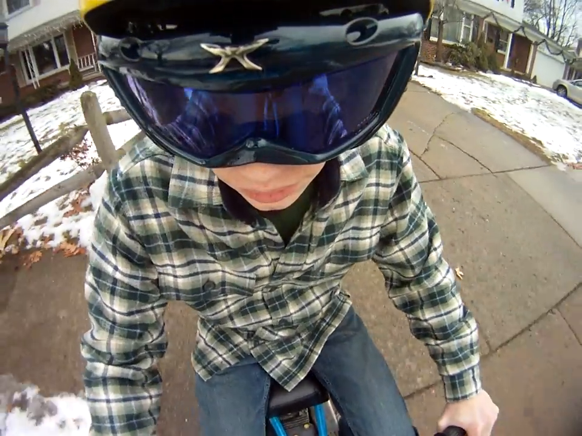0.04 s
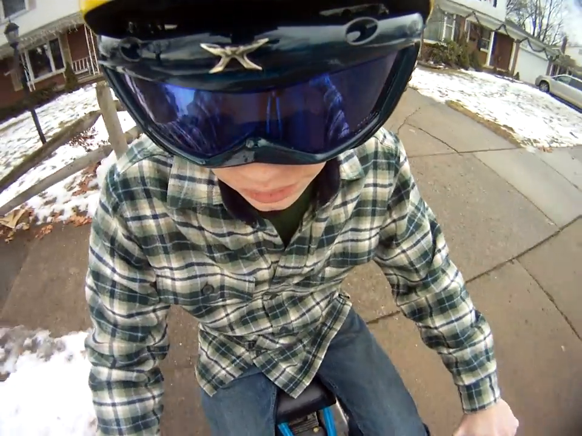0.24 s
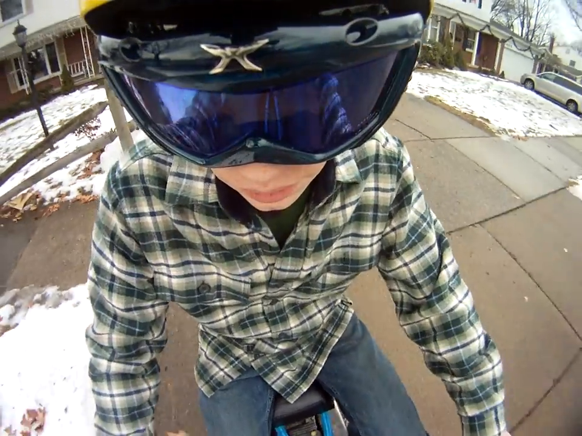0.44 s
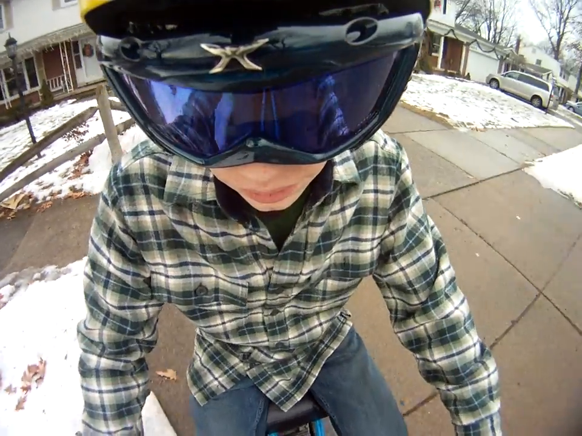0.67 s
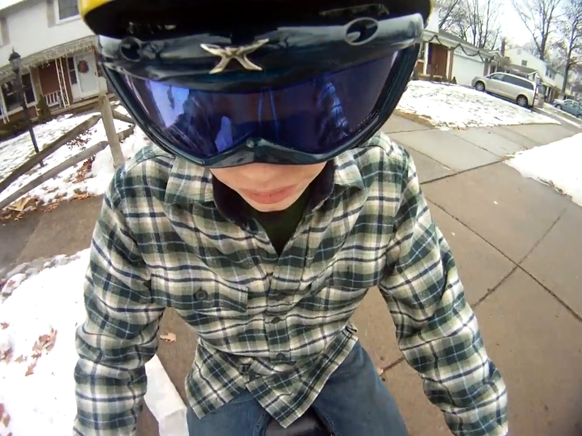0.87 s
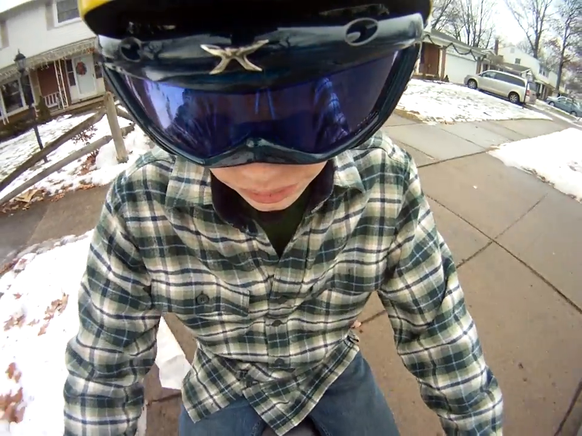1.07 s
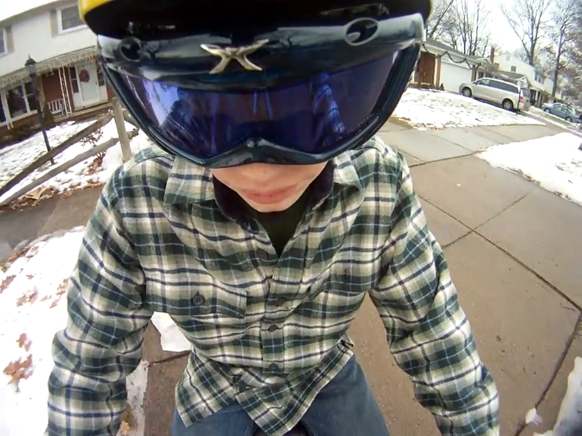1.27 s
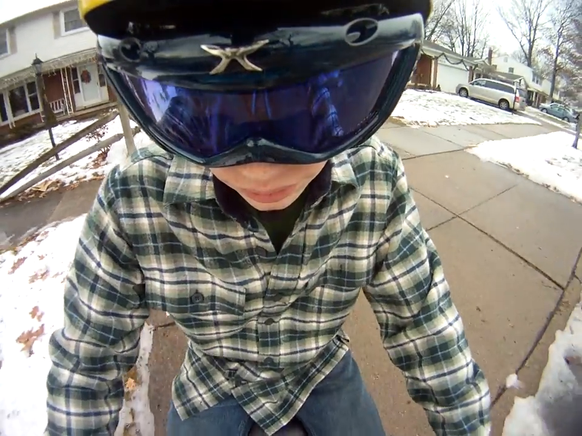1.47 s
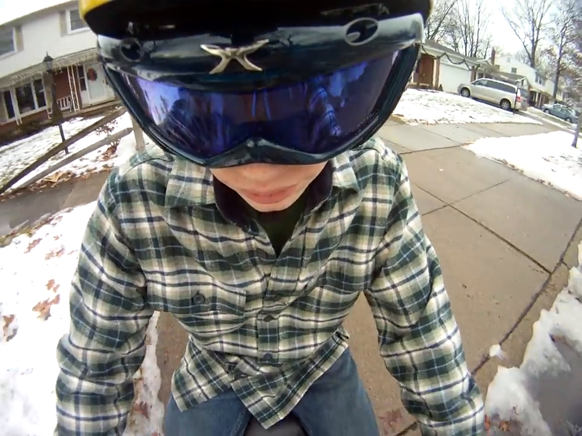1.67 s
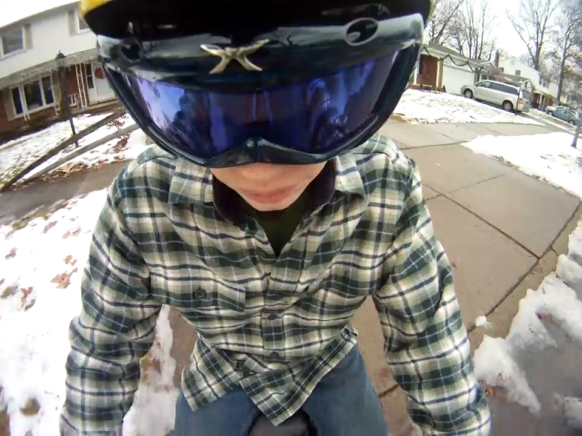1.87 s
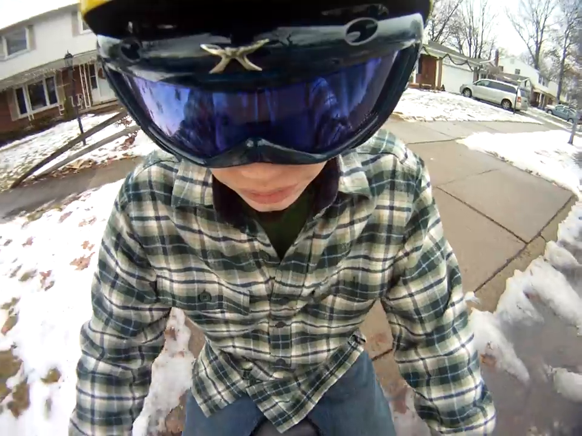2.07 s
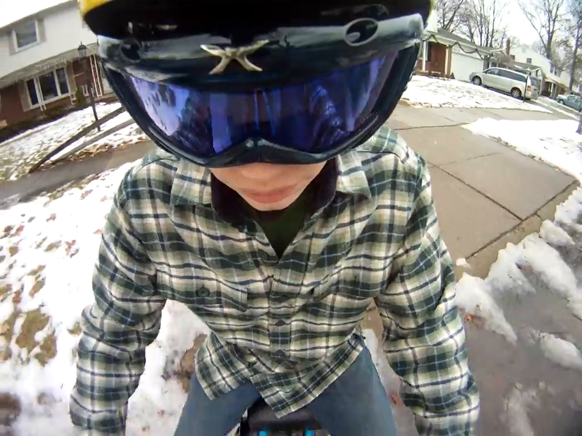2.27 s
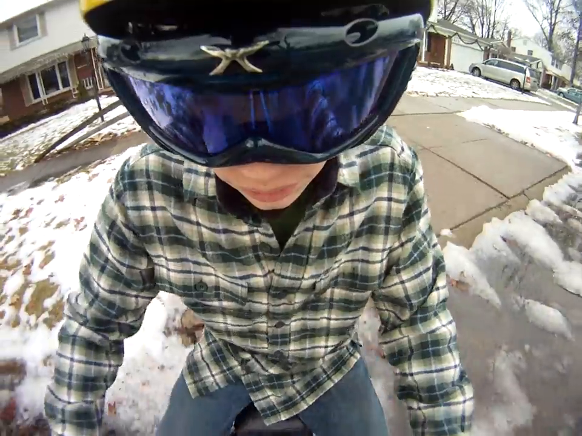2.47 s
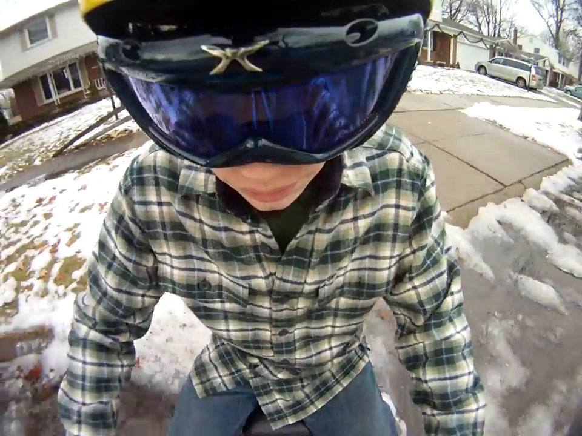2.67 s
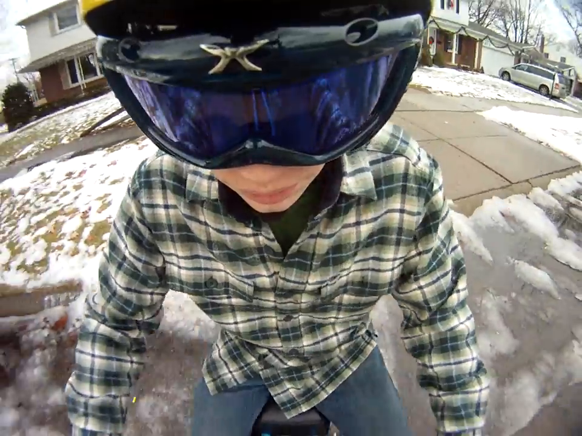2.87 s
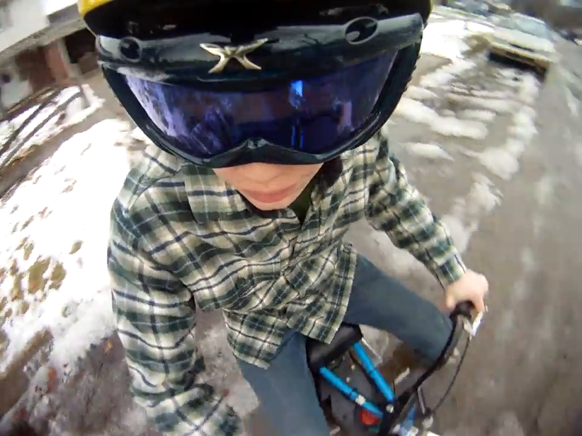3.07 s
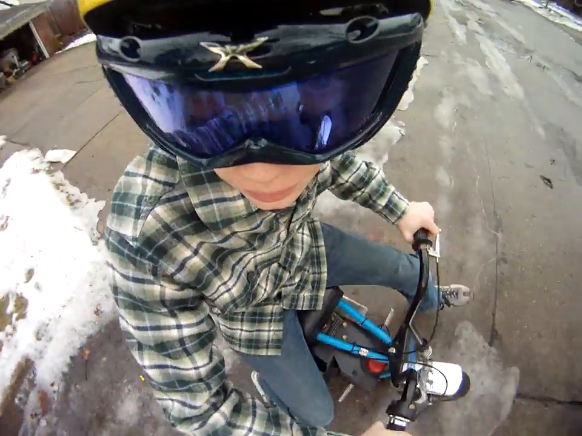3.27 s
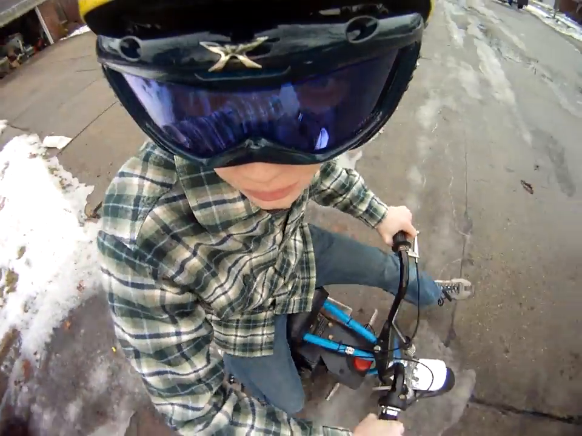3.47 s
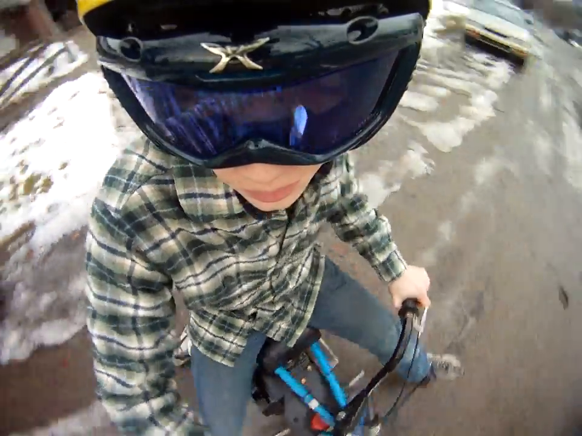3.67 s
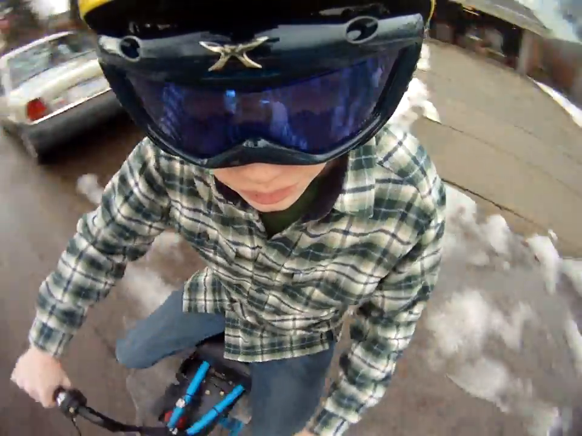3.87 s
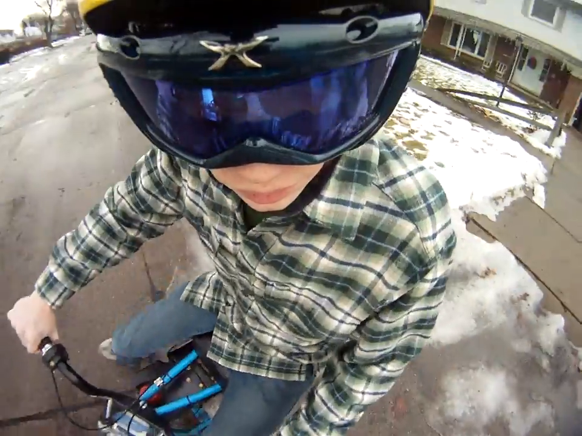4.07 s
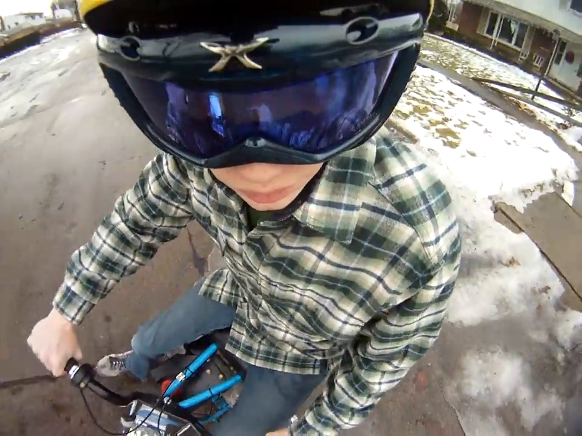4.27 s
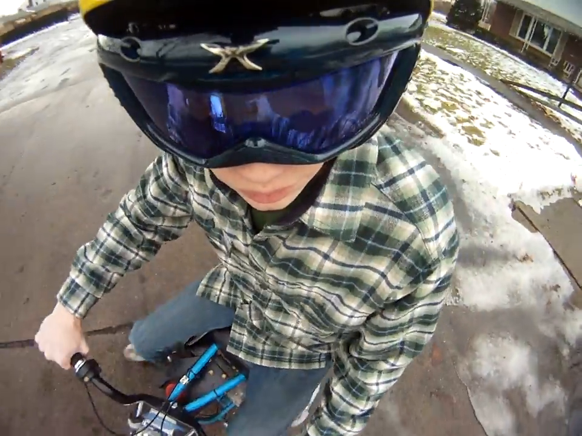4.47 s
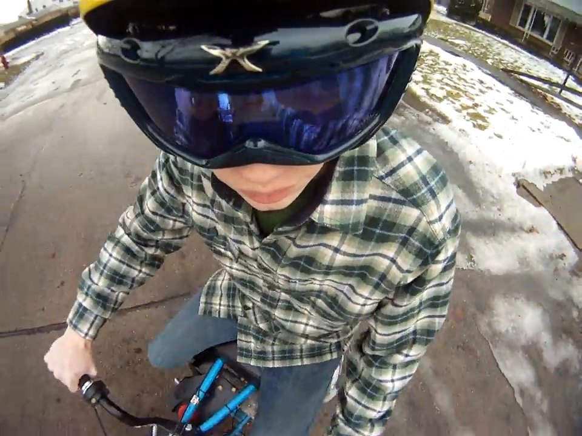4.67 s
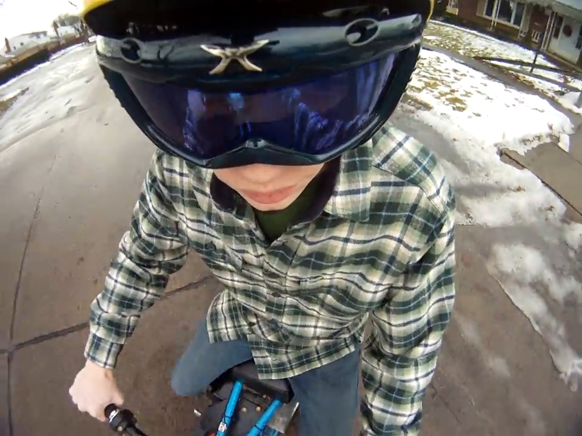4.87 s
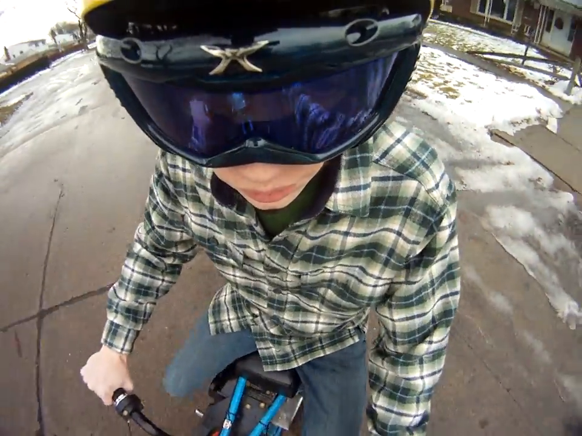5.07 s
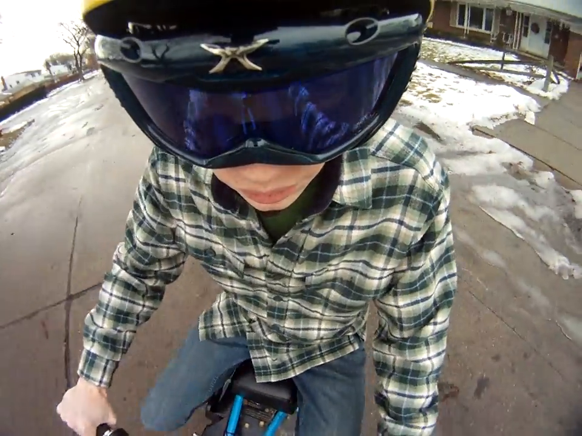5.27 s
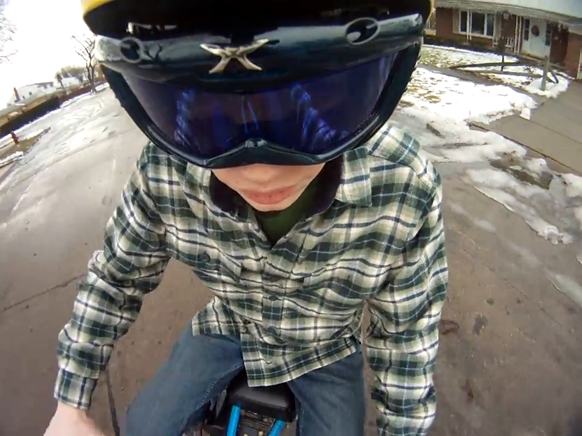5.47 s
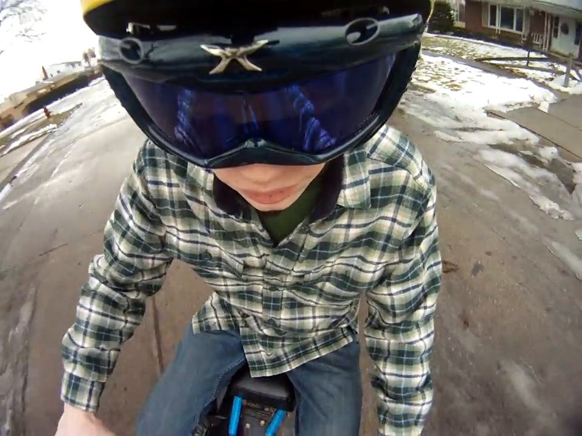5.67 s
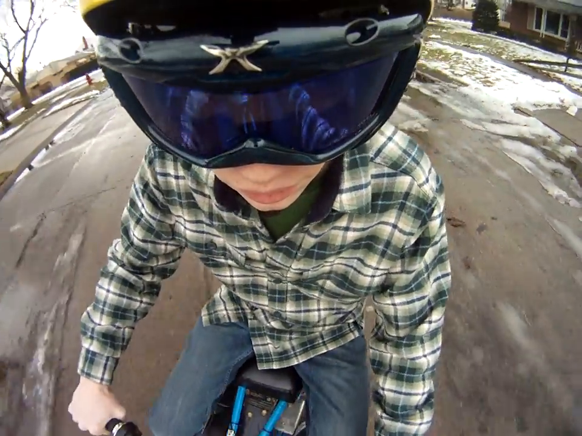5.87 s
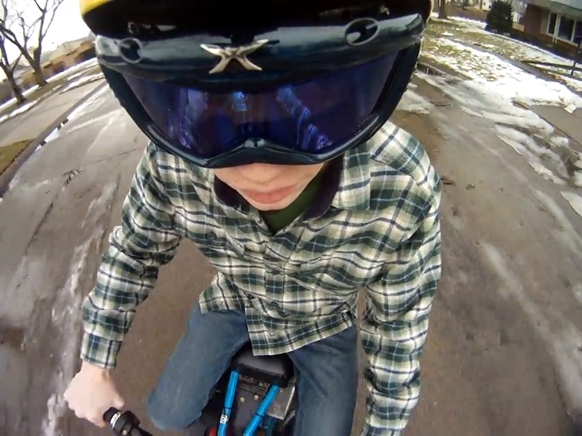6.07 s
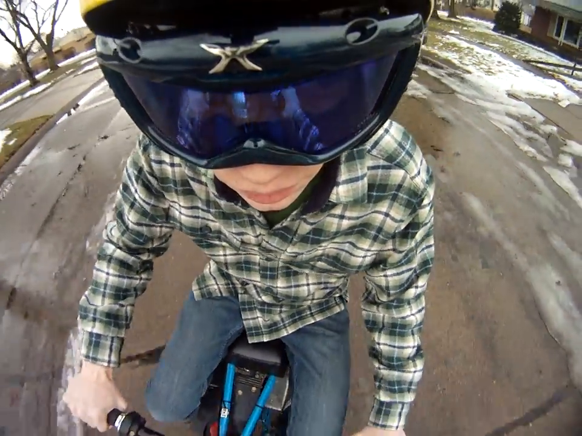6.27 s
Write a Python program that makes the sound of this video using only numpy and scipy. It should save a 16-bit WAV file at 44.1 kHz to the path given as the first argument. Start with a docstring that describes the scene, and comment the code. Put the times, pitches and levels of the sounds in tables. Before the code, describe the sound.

A small single-cylinder minibike putters and clatters near idle, a sharp click lands midway, then it revs into a rougher barking pull over deep wind rumble.

```python
"""A four-stroke minibike rolls down a driveway near idle, then revs up and rides along a street, heard from
the rider's helmet. Each cycle puffs noise-roughened pulses through muffler resonances and strikes the
casing with decaying noise bursts (piston, valve gear, loose metal); fan, chain, frame, crank and gas add on.
Filtered noise makes the wind, tyres and bumps; a sharp click crunches and rings the camera housing.
A bird chirps in gliding sines at the start; a 12 kHz sample-and-hold adds gritty treble."""
import sys
import numpy as np
from scipy import signal
from scipy.fft import rfft, irfft
from scipy.io import wavfile
from scipy.ndimage import uniform_filter1d

SR = 44100
rng = np.random.default_rng(int(sys.argv[2]) if len(sys.argv) > 2 else 0)


def generate_wav(signal):
    """Clip the signal to [-1, 1] and save it as 16-bit WAV at the path in sys.argv[1]."""
    frames = np.transpose(np.atleast_2d(signal))
    scaled = np.clip(frames, -1, 1) * 32767
    pcm = np.round(scaled).astype(np.int16)
    wavfile.write(sys.argv[1], SR, pcm)


N = 279153
TIME = np.arange(N) / SR

# deep rumble, lulling in the turn onto the street: start_s, crank_shake_db, wind_db
RUMBLE_LEVELS = [(0, -33.5, -45), (.8, -25, -34.5), (1.15, -37, -34), (1.9, -29.5, -35), (2.3, -35.5, -40),
                 (3.0, -31, -37), (3.3, -37.5, -49), (3.7, -40.5, -45), (4.0, -31, -32), (4.6, -39, -29.5),
                 (5.5, -24, -29), (6.3, -29.5, -26.5)]
# contacts of the click: start_s, level_db
CLICK_CONTACTS = [(2.5392, -5), (2.5408, -11.5), (2.542, 3)]


def undb(db):
    """Decibels to gain."""
    return 10 ** (np.asarray(db) / 20)


def unit(x):
    """Scale to rms 1."""
    return x / np.sqrt(np.mean(x ** 2))


def curve(rows, order=1):
    """One column of a table, joined by straight lines in time."""
    rows = np.array(rows)
    return np.interp(TIME, rows[:, 0], rows[:, order])


def colour(x, points):
    """Minimum-phase filter with a (hz, db) spectrum, by folding the cepstrum."""
    size = 2 ** 19
    hz, db = np.transpose(points)
    freq = np.arange(size // 2 + 1) * SR / size
    gain_db = np.interp(np.log(freq + 1), np.log(hz), db)
    cepstrum = irfft(np.log(undb(gain_db)))
    cepstrum[1:size // 2] *= 2
    cepstrum[size // 2 + 1:] = 0
    return irfft(rfft(x, size) * np.exp(rfft(cepstrum)))[:N]


def coloured_noise(points):
    """Steady noise with a (hz, db) spectrum, rms 1."""
    return unit(colour(rng.standard_normal(N), points))


def resonate(x, hz, width_hz):
    """One resonance, gain 1 at its centre."""
    return signal.lfilter(*signal.iirpeak(hz, hz / width_hz, fs=SR), x)


def resonances(x, table):
    """Parallel resonances: hz, width_hz, level_db."""
    return sum(undb(db) * resonate(x, hz, width_hz) for hz, width_hz, db in table)


def walk(rate_hz):
    """Slow random drift, rms 1."""
    k = int(SR / rate_hz)
    steps = np.repeat(rng.standard_normal(N // k + 1), k)
    return unit(uniform_filter1d(uniform_filter1d(steps, k), k)[:N])


def since(times_s):
    """For each sample: seconds since the latest of these times, and which one it was (0: none yet)."""
    times_s = np.r_[-1, times_s]
    which = np.searchsorted(times_s, TIME, side="right") - 1
    return TIME - times_s[which], which


def moments(cycle, place):
    """Times in s at which the engine passes one place in its cycle."""
    return np.interp(np.arange(np.ceil(cycle[0] - place), cycle[-1] - place) + place, cycle, TIME)


def strikes(table, decay_s):
    """Envelope of single decaying blows: start_s, level_db."""
    times_s, db = np.transpose(table)
    age_s, which = since(times_s)
    return np.r_[0, undb(db)][which] * (1 - np.exp(-age_s / 0.00034)) * np.exp(-age_s / decay_s)


def blows(cycle, throttle, table, jitter_s, rise_s, scatter_db=2.0):
    """Envelope of blows recurring each cycle with random size and timing; harder under load, longer when slow."""
    power = 0
    speed = np.gradient(cycle)
    slowness = (speed.max() / speed) ** 0.39
    for place, db, load_db, decay_s in table:
        times_s = moments(cycle, place)
        chance = rng.standard_normal((len(times_s) + 1, 2))
        age_s, which = since(np.sort(times_s + jitter_s * chance[1:, 0]))
        size = undb(db + load_db * throttle + scatter_db * chance[which, 1])
        power = power + (size * (1 - np.exp(-age_s / rise_s)) * np.exp(-age_s / decay_s / slowness)) ** 2
    return np.sqrt(power)


def metal(envelope, points, grain_db):
    """Dense metal contacts of uneven size ring the engine casing; output takes the envelope's rms."""
    # block and covers: hz, width_hz, level_db
    casing = [(464, 167, -7), (667, 91, -12), (763, 36, -9.5), (920, 193, -13.5), (1314, 98, -6),
              (1442, 200, -4), (1980, 62, -3.5), (2091, 150, 1), (2340, 153, -2.5), (2562, 104, -1),
              (2675, 120, 1.5), (2965, 95, 2), (3020, 120, -17), (3405, 250, -5.5), (3578, 33, 0.5),
              (4656, 220, -5), (4965, 54, -3.5), (5300, 37, -33)]
    grains = rng.standard_normal(N) * undb(grain_db * walk(1500))
    contacts = colour(grains * envelope, points)
    return unit(resonances(contacts, casing)) * np.sqrt(np.mean(envelope ** 2))


def bird():
    """Gliding, slightly wavering whistles that swell and fade, with a faint echo off the houses."""
    # start_s, length_s, start_pitch_hz, middle_pitch_hz, end_pitch_hz, level_db
    notes = [(0.179, 0.038, 4620, 4770, 4690, -33.5), (0.211, 0.049, 4540, 4440, 4370, -37),
             (0.261, 0.034, 4430, 4575, 4660, -34.5), (0.27, 0.055, 2680, 2795, 2760, -30),
             (0.579, 0.017, 4850, 4530, 4430, -42.5), (0.611, 0.064, 4370, 4810, 4960, -38.5)]
    song = np.zeros(N)
    for start_s, length_s, first_hz, middle_hz, last_hz, db in notes:
        along = np.clip((TIME - start_s) / length_s, 0, 1)
        glide_hz = np.polyval(np.polyfit([0, .5, 1], [first_hz, middle_hz, last_hz], 2), along)
        pitch_hz = glide_hz * (1 + 0.0092 * walk(400))
        swell = np.sin(np.pi * along) * undb(db + 1.2 * walk(146.7))
        song += swell * np.sin(2 * np.pi * np.cumsum(pitch_hz) / SR)
    tail = rng.standard_normal(SR) * undb(-60 * TIME[:SR] / 0.22)  # t60 0.22 s
    return song + undb(-9) * signal.fftconvolve(song, tail / np.linalg.norm(tail))[:N]


def wind():
    """Eddies rock the microphone in slow, deep swings, with a few short buffets."""
    # spectrum: hz, level_db
    wind_colour = [(10, -24), (20, -2.5), (27, -1), (36, -4.5), (48, -29), (100, -38.5), (250, -55.5),
                   (1000, -98), (5000, -100)]
    # buffets of air: centre_s, half_length_s (to 1/e), level_db
    gusts = [(2.804, 0.064, -23), (2.926, 0.022, -26.5), (3.11, 0.051, -25), (3.883, 0.046, -25)]
    eddies = colour(rng.standard_normal(N), wind_colour)
    eddies = eddies / np.sqrt(uniform_filter1d(eddies ** 2, SR // 6))
    buffets = sum(undb(db) * np.exp(-((TIME - at_s) / half_s) ** 2) for at_s, half_s, db in gusts)
    return eddies * (undb(curve(RUMBLE_LEVELS, 2)) + buffets)


def tyres():
    """Low, uneven noise rumble from the small tyres rolling on concrete."""
    # spectrum: hz, level_db
    tyre_colour = [(30, -9), (60, 11), (85, 1), (130, -6.5), (180, -3.5), (250, -10.5), (500, -31),
                   (3000, -35)]
    return coloured_noise(tyre_colour) * undb(-58.0 + 1.3 * walk(4.4))


def bumps():
    """Short dull noise knocks as the wheels drop over joints and the kerb."""
    # start_s, level_db
    bump_hits = [(2.591, -55), (3.151, -40), (4.128, -36)]
    # spectrum: hz, level_db
    bump_colour = [(150, -18), (500, -9), (800, -2), (1200, 4.5), (1500, -3), (2500, -35), (5000, -22)]
    return coloured_noise(bump_colour) * strikes(bump_hits, decay_s=0.0079)


def click():
    """A short stutter of contacts, each a noise crunch plus decaying sine modes of the struck camera housing."""
    # housing modes: hz, t60_s, level_db
    housing = [(27.9, 0.33, -11.5), (73.4, 0.18, -34), (139, 0.054, -17.5), (796, 0.069, -31),
               (1310, 0.038, -24), (1950, 0.022, -12.5), (2030, 0.014, -26), (3000, 0.016, -22),
               (3800, 0.0081, -27)]
    # crunch spectrum: hz, level_db
    crunch_colour = [(80, 16), (200, -1.5), (400, -9.5), (800, 0), (1400, 5), (2200, 3.5), (4200, -3),
                     (5800, -21)]
    out = np.zeros(N)
    for start_s, db in CLICK_CONTACTS:
        age_s = np.maximum(TIME - start_s, 0)
        ring = sum(undb(mode_db - 60 * age_s / t60_s) * np.sin(2 * np.pi * hz * age_s)
                   for hz, t60_s, mode_db in housing)
        burst = rng.standard_normal(N) * np.exp(-age_s / 0.0029) * (age_s > 0)
        crunch = colour(burst, crunch_colour)
        out += undb(db) * (undb(-2.5) * ring + undb(-16.0) * crunch)
    return out


def thud():
    """The helmet shudders briefly after the last contact of the click: a decaying dull noise."""
    # spectrum: hz, level_db
    thud_colour = [(60, 4.5), (160, -7.5), (300, -12), (500, -23), (800, -14), (1500, -23), (4000, -45)]
    last_s = CLICK_CONTACTS[-1][0]
    return coloured_noise(thud_colour) * strikes([(last_s, 0)], decay_s=0.036) * undb(-32)


def hum(cycle, revs):
    """Each firing refreshes the singing of the frame panels; they fade as the engine speeds up."""
    # panels: pitch_hz, wander_hz (rms), level_db
    frame = [(422, 4.46, -65.5), (444.3, 9.98, -67.5), (862, 2.35, -74)]
    panels = 0
    for hz, wander_hz, db in frame:
        pitch_hz = hz + wander_hz * walk(40)
        panels = panels + undb(db) * np.sin(2 * np.pi * np.cumsum(pitch_hz) / SR)
    swell = 1 + 0.061 * np.cos(2 * np.pi * (cycle - .2))
    return np.sqrt(2) * panels * swell * (1 - 0.48 * revs)


def shake(cycle, revs):
    """The crankshaft turns twice a cycle and shakes bike and rider; the power stroke adds overtones at speed."""
    turn = 2 * np.pi * (cycle + 0.13)
    crank = np.cos(2 * turn) * undb(curve(RUMBLE_LEVELS, 1))
    return crank + revs * (undb(-49.5) * np.cos(3 * turn) + undb(-52.5) * np.cos(4 * turn))


def whirr(cycle, revs):
    """Fan and chain rustle on between the blows, slackening in the compression stroke and louder at speed."""
    # spectrum: hz, level_db
    whirr_colour = [(100, 23.5), (300, 1), (700, 3), (1300, 3), (2100, 3.5), (3000, -1), (3700, -0.5),
                    (5500, -3.5)]
    idle_db, rev_gain_db = -50.5, 4.5
    swell = 1 - 0.16 * np.cos(2 * np.pi * (cycle + 0.38))
    level = undb(idle_db + rev_gain_db * revs + 1.0 * walk(25))
    return metal(swell * level, whirr_colour, grain_db=-0.5)


def growl(cycle, revs, throttle):
    """Gas rushes through carburettor and pipe once a cycle, swelling with speed and as the throttle opens."""
    # spectrum: hz, level_db
    gas_colour = [(70, -4), (150, -4.5), (220, -9.5), (290, 1), (400, -8), (550, -3.5), (650, -2),
                  (760, -2), (1000, -21), (1500, -1), (3000, -14.5)]
    idle_db, rev_gain_db = -69, 23.5
    flow = (1 + 0.23 * np.cos(2 * np.pi * (cycle - .02))) * throttle ** 0.92
    return coloured_noise(gas_colour) * flow * undb(idle_db + rev_gain_db * revs)


def tappet(cycle, throttle):
    """The tappet takes up its clearance with a small bright tick once a cycle, harder under load."""
    shut_db, load_gain_db = -46.5, 13
    times_s = moments(cycle, -0.01483)
    chance = rng.standard_normal((len(times_s) + 1, 2))
    age_s, which = since(times_s)
    hz = 4960 * (1 + 0.0052 * chance[which, 0])
    ring = np.sin(2 * np.pi * hz * age_s) + undb(-2.0) * np.sin(2 * np.pi * 5520 * age_s)
    size = undb(shut_db + load_gain_db * throttle + 3.3 * chance[which, 1])
    return size * ring * (1 - np.exp(-age_s / 0.0014)) * np.exp(-age_s / 0.0039)


def valve_gear(cycle, throttle, shade):
    """Valve gear and loose metal rattle the covers; the helmet shades the valve blows but not the clacks."""
    # place_cycles (after the exhaust pulse), shut_throttle_db, load_gain_db, decay_s (at top speed)
    valve_blows = [(-.23, -48.5, 5, 0.0027), (-.055, -39.5, 7, 0.0044), (.025, -49, 13.5, .004),
                   (0.129, -42, 7.5, 0.0064)]
    # loose metal: start_s, level_db
    clacks = [(0.1147, -28.5), (0.2637, -32.5), (0.3633, -35), (0.429, -39.5), (1.0859, -34.5),
              (1.456, -42), (1.5494, -38), (3.7944, -31), (4.5526, -36)]
    # spectrum: hz, level_db
    valve_colour = [(200, -10), (700, -1), (1400, -5.5), (2100, 2.5), (3000, 7.5), (3700, 3.5), (5500, 2)]
    valves = blows(cycle, throttle, valve_blows, jitter_s=0.0009, rise_s=0.001) * shade
    valves = np.hypot(valves, strikes(clacks, decay_s=0.0086))
    return metal(valves, valve_colour, grain_db=1.0)


def piston(cycle, throttle):
    """The piston knocks on the block; under load it strikes harder and crossfades to a brighter spectrum."""
    # place_cycles (after the exhaust pulse), shut_throttle_db, load_gain_db, decay_s (at top speed)
    piston_blows = [(-.25, -41.5, 17, .003), (-.185, -44, 18, .004), (0.259, -41.5, 3.5, 0.0054),
                    (.45, -44.5, 3.5, 0.0051)]
    # hardest combustion knocks, before the 8.5 dB cut: start_s, level_db
    hard_knocks = [(1.4374, -23), (1.6252, -27), (2.6479, -23.5), (3.6495, -28.5), (3.7818, -30),
                   (3.8432, -29), (4.3107, -21), (4.3593, -24), (4.542, -40), (5.4046, -24),
                   (5.4554, -19.5)]
    # spectra, throttle shut and open: hz, level_db
    light_colour = [(200, 0.5), (700, -10), (1400, -2.5), (2100, 6.5), (2700, 1), (3600, -12.5),
                    (5500, -7.5)]
    loaded_colour = [(200, -4.5), (700, -8), (1400, 0.5), (2100, 2), (2700, 4.5), (3600, -5.5),
                     (5500, -7.5)]
    envelope = blows(cycle, throttle, piston_blows, jitter_s=0.0008, rise_s=0.0011)
    envelope = np.hypot(envelope, strikes(hard_knocks, decay_s=0.0039) * undb(-8.5))
    light = metal(envelope * np.sqrt(1 - throttle), light_colour, grain_db=0.4)
    loaded = metal(envelope * np.sqrt(throttle), loaded_colour, grain_db=0.5)
    return light + loaded


def exhaust(cycle, revs, throttle):
    """A puff per firing rings the muffler: round and uneven at idle, abrupt and barking in the pipe under load."""
    # resonances of the muffler, and of the pipe under load: hz, width_hz, level_db
    muffler_modes = [(62.6, 15, 6.5), (122.4, 68, 5.5), (146.4, 22, 6), (197, 54, -4.5), (259, 66, -9),
                     (417, 58, -11), (528, 49, 0), (630, 88, -6), (820, 180, -10)]
    bark_modes = [(112, 30, 2), (288, 110, 1.5), (392, 83, 0.5), (634, 71, 4)]
    # weak idle firings: start_s (nearest firing is taken)
    misfires = [.35, .52, .88, 1.07, 1.36, 2.01, 2.39]
    idle_db, rev_gain_db, load_gain_db, misfire_db = -54.5, 4, 3.1, -6.5
    times_s = moments(cycle, 0) - .0014
    age_s, which = since(times_s)
    width_s = 0.0015 * np.exp(-0.9 * revs - 1.02 * throttle)
    size = undb(1.2 * (1 - revs) * rng.standard_normal(len(times_s) + 1)[which])
    puff = size * age_s ** 2 / width_s ** 3 * np.exp(-age_s / width_s)
    puff = puff * (1 + 0.12 * rng.standard_normal(N))
    puff = puff + 0.61 * revs * np.interp(TIME - .0099, TIME, puff)  # repeat 9.9 ms later
    pipe = resonances(puff, muffler_modes) + resonances(puff, bark_modes) * throttle ** 4
    pipe = signal.sosfilt(signal.butter(2, 55, "high", fs=SR, output="sos"), pipe)
    steady = pipe / np.sqrt(uniform_filter1d(pipe ** 2, SR // 2))  # level evened over 0.5 s
    missed = np.isin(which, [np.argmin(abs(times_s - at_s)) + 1 for at_s in misfires])
    level_db = idle_db + rev_gain_db * revs ** 0.49 + load_gain_db * throttle + misfire_db * missed
    return steady * undb(level_db)


def scene():
    """Everything on the engine follows one cycle count; revs climb from 0 at idle and level off at 1."""
    # engine speed: start_s, firings_hz
    speed_points = [(0, 13.65), (0.12, 13.03), (0.38, 12.0), (1.08, 10.04), (1.81, 11.21), (2.15, 10.25),
                    (2.7, 11.4), (3.1, 11.51), (3.46, 12.36), (3.63, 13.54), (3.95, 18.44), (4.4, 22.0),
                    (4.62, 20.3), (5.02, 19.79), (5.3, 18.76), (5.48, 19.34), (6.33, 19.21)]
    # easing off, a blip, a long pull, a short lift, then cruising: start_s, throttle (0-1)
    throttle_points = [(0, 0.14), (.8, 0.03), (1.5, 0.31), (2.0, .1), (3.45, 0.27), (3.8, 0.83),
                       (4.1, 0.55), (4.55, .96), (5.0, 0.89), (5.17, 0.44), (5.45, 0.75), (6.3, .66)]
    idle_hz, full_hz = 10, 22
    rate_hz = curve(speed_points)
    cycle = .5 + np.cumsum(rate_hz) / SR
    revs = np.sin(np.pi / 2 * np.clip((rate_hz - idle_hz) / (full_hz - idle_hz), 0, 1))
    throttle = np.clip(curve(throttle_points), 0, 1)
    # the rider looks along the street; the helmet shades the bright valve noise
    look_s, look_half_s, look_db = 3.42, 0.14, -3
    shade = undb(look_db * np.exp(-((TIME - look_s) / look_half_s) ** 2))
    surroundings = bird() + wind() + tyres() + bumps() + click() + thud()
    mechanics = hum(cycle, revs) + shake(cycle, revs) + whirr(cycle, revs)
    mechanics += shade * tappet(cycle, throttle) + valve_gear(cycle, throttle, shade) + piston(cycle, throttle)
    gas = growl(cycle, revs, throttle) + exhaust(cycle, revs, throttle)
    return (surroundings + mechanics + gas)[None]


def record(dry):
    """The camera samples at 12 kHz and holds each value, which mirrors the sound into a gritty treble."""
    coarse = signal.resample_poly(dry, 40, 147, axis=-1, window=("kaiser", 5))
    held = np.repeat(coarse, 4, axis=-1)  # 48 kHz
    held = signal.resample_poly(held, 147, 160, axis=-1)[:, :N]
    hiss = undb(-90) * rng.standard_normal(held.shape)
    top_hz = 15500
    return signal.sosfilt(signal.ellip(8, .2, 70, top_hz, fs=SR, output="sos"), held + hiss)


dry = scene()
out = record(dry)
generate_wav(out)
```